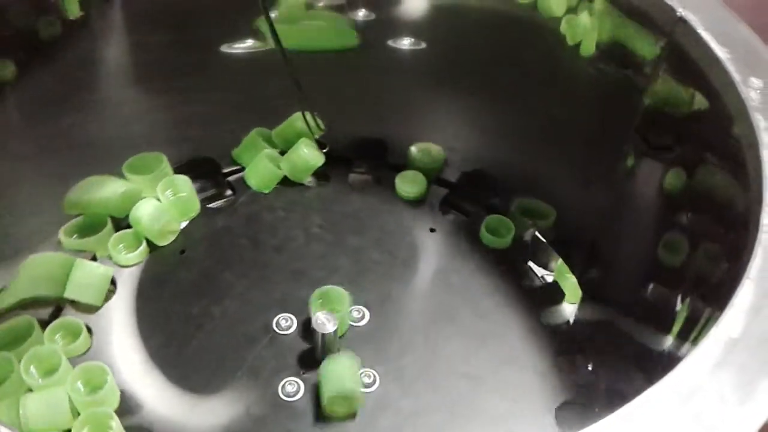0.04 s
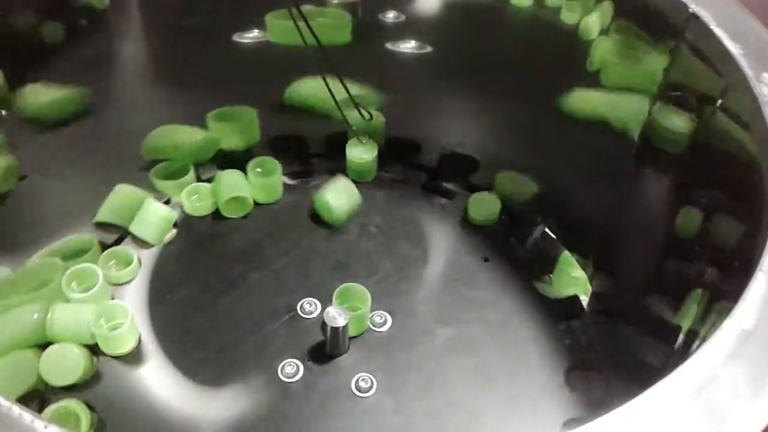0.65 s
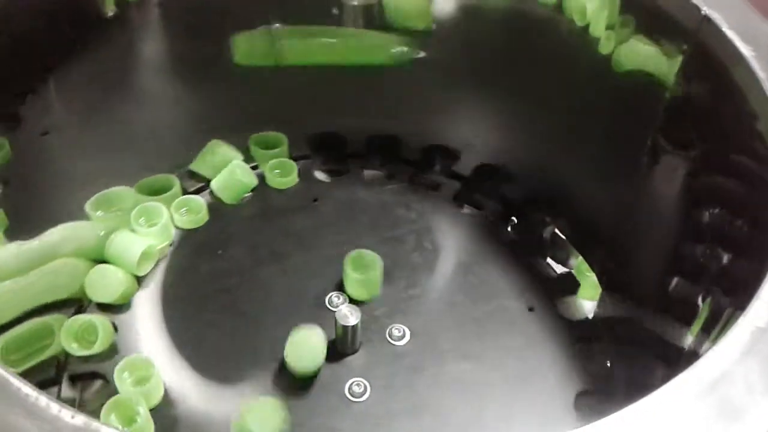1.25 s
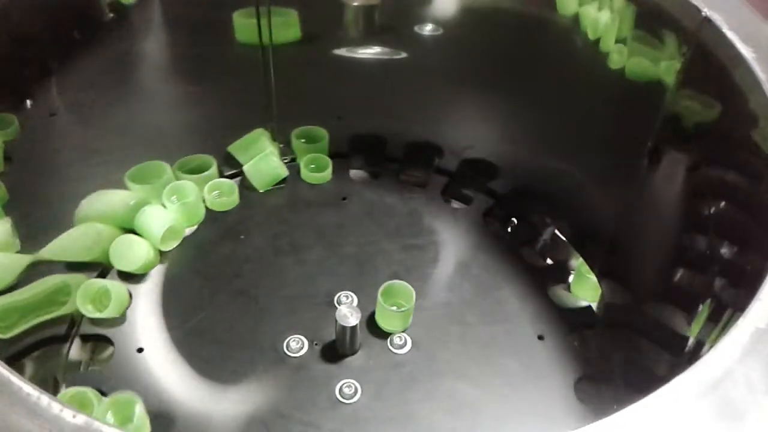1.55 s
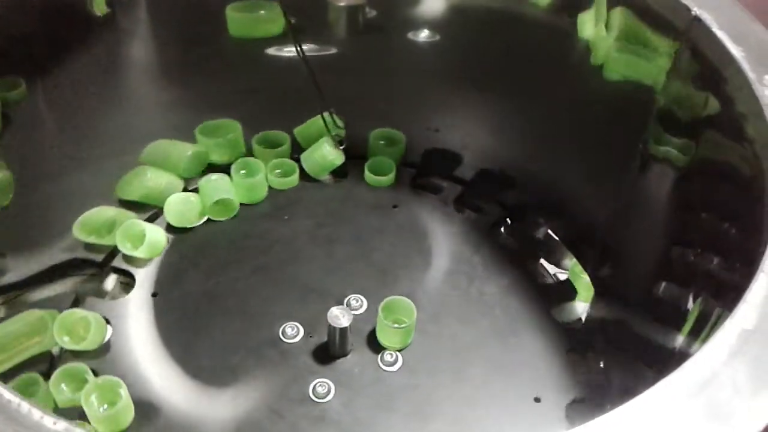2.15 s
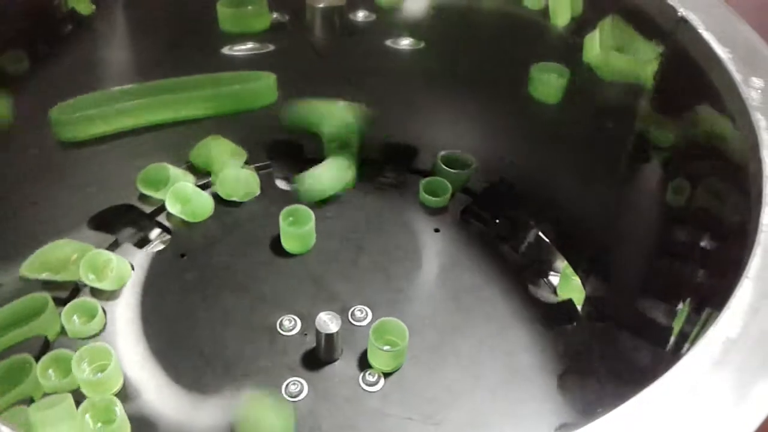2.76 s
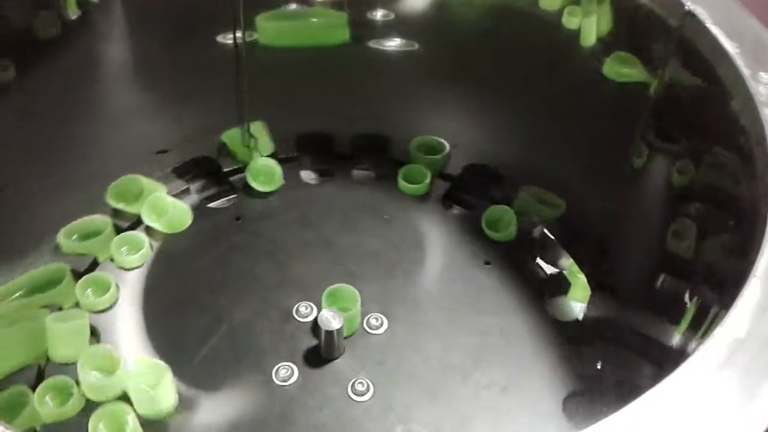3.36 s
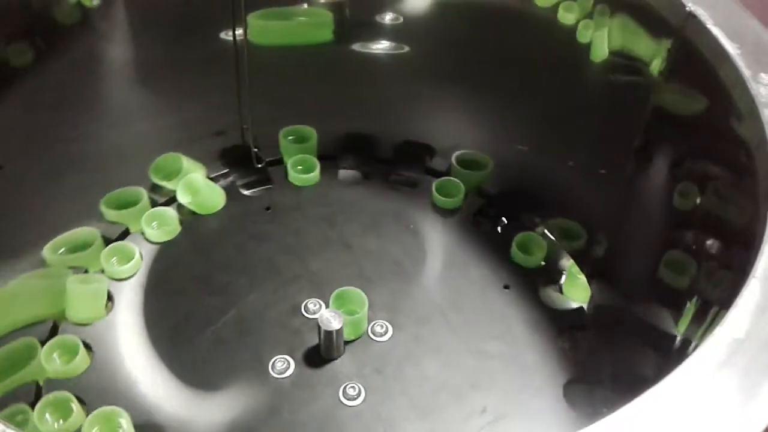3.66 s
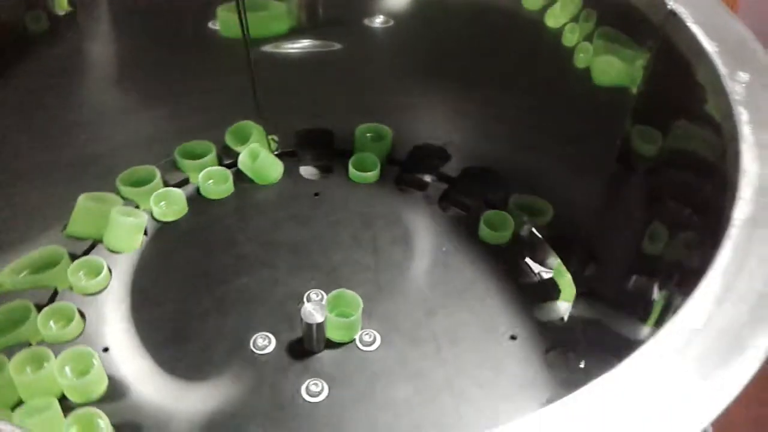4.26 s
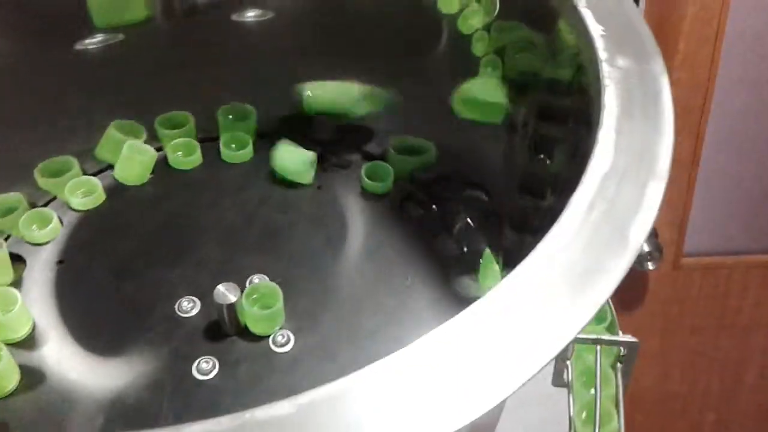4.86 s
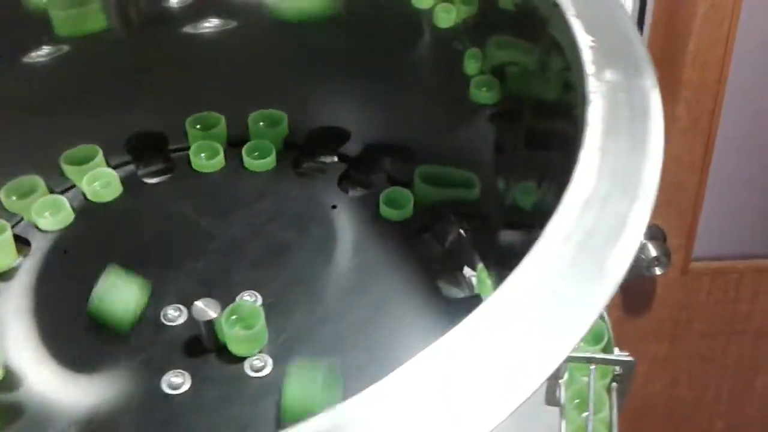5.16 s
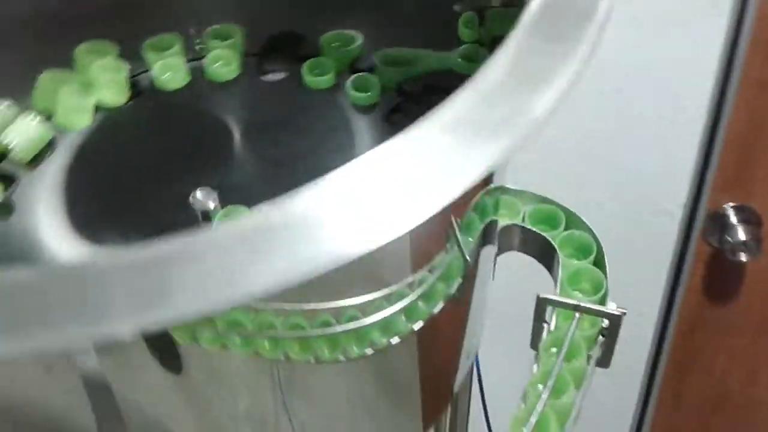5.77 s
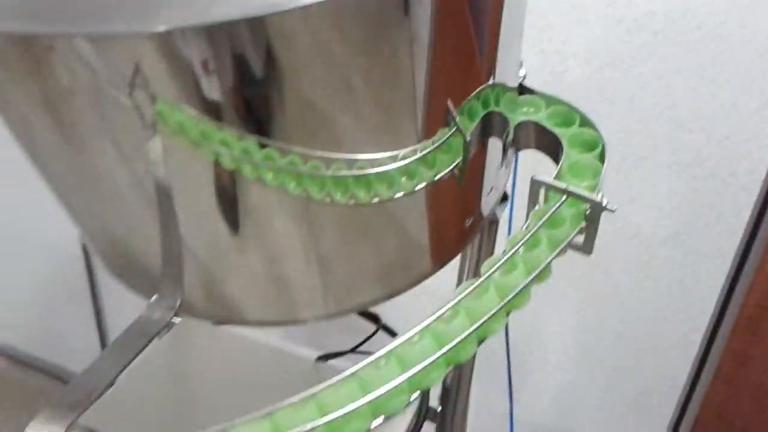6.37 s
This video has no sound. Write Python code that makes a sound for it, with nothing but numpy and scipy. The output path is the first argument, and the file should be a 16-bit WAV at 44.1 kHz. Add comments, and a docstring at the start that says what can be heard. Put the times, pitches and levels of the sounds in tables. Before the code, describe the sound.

Close over a rotating cap feeder, small plastic caps clatter against a steel bowl in three bursts, with bright clangs, dry clicks, hollow knocks and a soft boom from the disc. Between the bursts come scraping and a few stray hits, and a last brief stir follows. A high, regularly pulsing hiss and a quiet low motor hum run throughout. Everything is heard on the left side.

```python
"""Bottle caps in a rotary dispenser.

Plastic caps turn in a steel bowl, heard from close above the rim, on the left channel only.
A high hiss swells evenly, about 2.4 times a second, with scrapes and grinding over it.
Caps knock into the disc's pockets. Three times the heap tumbles and caps ring the bowl;
it stirs again at the end. A motor hums below."""
import sys
import numpy as np
from scipy import signal
from scipy.io import wavfile
from scipy.ndimage import uniform_filter1d

SR = 44100
rng = np.random.default_rng(int(sys.argv[2]) if len(sys.argv) > 2 else 0)


def int16_out(signal):
    """Quantize to a 16-bit WAV file."""
    q = np.round(np.clip(np.atleast_2d(signal).T, -1, 1) * 32767)
    wavfile.write(sys.argv[1], SR, q.astype(np.int16))


N = 291501
TIME = np.arange(N) / SR
SWELL_PERIOD_S = 0.4167


def amp(db):
    """Decibels to gain."""
    return 10 ** (np.asarray(db) / 20)


def read(points, hz):
    """A table's values at hz, interpolated on a log-frequency axis."""
    point_hz, value = np.transpose(points)
    return np.interp(np.log(hz + 1), np.log(point_hz), value)


def add(mix, s, sound):
    """Mixes a sound in at s seconds."""
    part = mix[max(round(s * SR), 0):][:len(sound)]
    part += sound[:len(part)]


def shaped(x, gain, size=512):
    """Filters x by gain(hz, s), frame by frame."""
    frames = dict(nperseg=size, noverlap=size * 3 // 4)
    hz, s, spectrum = signal.stft(x, SR, **frames)
    return signal.istft(spectrum * gain(hz[:, None], s), SR, **frames)[1][:len(x)]


def grains(per_s, spread_db, share, size=N):
    """Tiny uneven clicks over smooth noise; power 1, of which share is in the clicks."""
    clicks = (rng.random(size) < per_s / SR) * rng.choice([-1, 1], size)
    clicks = clicks * amp(spread_db * np.minimum(rng.exponential(1, size), 3))
    crackle = np.sqrt(share) * clicks / (clicks.std() + 1e-9)
    return crackle + np.sqrt(1 - share) * rng.standard_normal(size)


def band_noise(lo_hz, hi_hz, t):
    """Band-passed noise of power 1, as long as t."""
    band = signal.butter(2, [lo_hz, hi_hz], "band", fs=SR, output="sos")
    noise = signal.sosfilt(band, rng.standard_normal(len(t)))
    return noise / noise.std()


def coloured_noise(colour):
    """Steady noise filtered by rows of frequency in Hz, gain in dB."""
    return shaped(rng.standard_normal(N), lambda hz, s: amp(read(colour, hz)), size=2048)


def no_bass(x, cutoff_hz=190):
    """Takes out the deep bass below cutoff_hz."""
    return signal.sosfilt(signal.butter(3, cutoff_hz, "high", fs=SR, output="sos"), x)


def motor():
    """Mains hum over the soft rush of the drive; both swell and fade a little."""
    # Mains partials. Each row: frequency in Hz, rms level in dB before the swell.
    partials = [(50, -89), (100, -73)]
    # Drive noise. Each row: frequency in Hz, gain in dB.
    rush_colour = [(20, -68), (60, -54), (150, -54), (300, -54.5), (800, -43.5), (3000, -34.5),
                   (16000, -72)]
    # Slow swell. Each row: time in seconds, gain in dB.
    swell = [(1.7, -5.5), (4.0, 3), (4.6, 4), (6.6, 0)]
    hum = sum(amp(db) * np.sqrt(2) * np.sin(2 * np.pi * hz * TIME) for hz, db in partials)
    return (hum + coloured_noise(rush_colour)) * amp(np.interp(TIME, *np.transpose(swell)))


def scrape(s, start_s, length_s, attack_s=0.0065, release_s=0.025):
    """Envelope of a caught cap: it bites quickly, drags and slips free."""
    bite = np.clip((s - start_s) / attack_s, 0, 1)
    return bite * np.exp(-np.maximum(s - start_s - length_s, 0) / release_s)


def hiss_and_scrapes():
    """A high hiss swells evenly and flutters; caps scrape the wall and grind as the heap stirs."""
    # Levels at the swell tops. Each row: time in seconds, hiss in dB, higher fizz in dB.
    hiss_levels = [(0, -22, -26.5), (0.55, -19, -25.5), (1.0, -24, -36), (1.6, -27, -38.5),
                   (2.15, -25, -40.5), (2.648, -19.5, -35), (3.0, -23.5, -36), (3.75, -22.5, -33.5),
                   (4.3, -16, -31), (4.7, -17.5, -21), (5.1, -16.5, -25), (5.6, -21.5, -25.5),
                   (6.61, -24.5, -29)]
    # Caps caught on the wall. Each row: start in seconds, length in seconds, hiss in dB, grind in dB.
    scrapes = [(0.0, 0.0084, -17.5, -17), (0.588, 0.078, -14.5, -26.5), (0.658, 0.17, -32, -22),
               (1.835, 0.03, -34, -48), (2.088, 0.041, -26, -30), (2.26, 0.028, -22.5, -33),
               (2.488, 0.049, -22, -30.5), (2.687, 0.012, -14.5, -26), (3.09, 0.073, -16, -29),
               (3.188, 0.18, -23.5, -24), (3.925, 0.052, -16, -22.5), (3.984, 0.12, -20, -18),
               (4.104, 0.084, -16, -21), (5.181, 0.068, -16.5, -16), (5.263, 0.19, -29, -15.5),
               (6.424, 0.21, -18, -22.5)]
    # Three noise spectra. Each row: frequency in Hz, gain in dB.
    hiss_colour = [(500, -45), (2000, -25), (3500, -17.5), (4700, -6), (5500, -7.5), (7200, 0.5),
                   (9400, -3.5), (11000, -16.5), (16000, -24)]
    grind_colour = [(800, -27), (2200, -5), (2850, -2.5), (3400, -3.5), (4550, -0.5), (5500, -5),
                    (7000, -10), (10000, -46), (16000, -51)]
    fizz_colour = [(5000, -12.5), (8000, -4.5), (9700, 3.5), (11000, -0.5), (12200, -5.5), (13200, -10),
                   (15800, -14)]
    swell_top_s, steepness, hiss_dip_db, fizz_dip_db = 0.515, 3.1, -5.5, -17
    grind_rest_db, grind_stir_db = -41, -9
    times_s, hiss_db, fizz_db = np.transpose(hiss_levels)

    def gain(hz, s):
        swell_phase = 2 * np.pi * (s - swell_top_s) / SWELL_PERIOD_S
        lull = (1 - np.tanh(steepness * np.cos(swell_phase))) / 2
        hiss = amp(np.interp(s, times_s, hiss_db) + hiss_dip_db * lull)
        fizz = amp(np.interp(s, times_s, fizz_db) + fizz_dip_db * lull)
        grind = np.hypot(amp(grind_rest_db), amp(grind_stir_db) * stir(s))
        for start_s, length_s, scrape_hiss_db, scrape_grind_db in scrapes:
            caught = scrape(s, start_s, length_s)
            hiss = np.hypot(hiss, amp(scrape_hiss_db) * caught)
            grind = np.hypot(grind, amp(scrape_grind_db) * caught)
        layers = [(hiss, hiss_colour), (grind, grind_colour), (fizz, fizz_colour)]
        power = sum((level * amp(read(colour, hz))) ** 2 for level, colour in layers)
        return np.sqrt(power) * hz / np.hypot(hz, 350)  # bass roll-off

    wobble = uniform_filter1d(rng.standard_normal(N), size=400)
    flutter_db = 0.3 * wobble / wobble.std()
    return shaped(grains(per_s=3300, spread_db=0.5, share=0.32), gain) * amp(flutter_db)


def stir(s, build_db_per_s=42.5, settle_db_per_s=46.5, rest_db=-36):
    """Envelope of the heap's motion: each tumble builds, holds and settles to a restless minimum."""
    # The heap lifts and gives way. Each row: start of the hold in seconds, its length, level in dB.
    tumbles = [(0.45, 0.93, -22.5), (2.78, 0.57, -19), (4.8, 0.84, -22), (6.425, 0.19, -29.5)]
    power = amp(rest_db) ** 2
    for start_s, length_s, db in tumbles:
        before_s, after_s = np.maximum(start_s - s, 0), np.maximum(s - start_s - length_s, 0)
        power = power + amp(db - build_db_per_s * before_s - settle_db_per_s * after_s) ** 2
    return np.sqrt(power)


def heap():
    """Many small, dull collisions among the loose caps."""
    # Collision spectrum. Each row: frequency in Hz, gain in dB.
    colour = [(100, -71), (250, -5.5), (400, -25), (530, -3), (640, -17.5), (770, 1.5), (1000, -13.5),
              (1450, -5), (2400, -10), (4000, -16), (10000, -37)]
    collisions = grains(per_s=170, spread_db=2.5, share=0.29)
    return shaped(collisions, lambda hz, s: amp(read(colour, hz)) * stir(s), size=1024)


def pockets(pocket_hz=784.5, rise_s=0.0052, clunk_t60_s=0.082):
    """Caps knock hollowly and rattle in the disc's pockets, or land flat with a dull clunk."""
    # Pocket knocks and flat landings. Each row: start in seconds, level in dB.
    knocks = [(0.192, -35.5), (0.244, -37.5), (0.72, -30.5), (1.085, -23.5), (1.996, -37.5), (2.746, -24),
              (2.897, -24), (3.0, -24), (3.29, -24), (3.389, -29.5), (3.449, -32.5), (3.914, -30.5),
              (4.887, -22), (4.915, -26), (4.949, -24), (4.98, -30), (5.015, -27), (5.043, -29),
              (5.100, -24.5), (6.064, -38)]
    clunks = [(0.244, -36), (1.965, -39), (2.726, -33), (3.495, -34)]
    out, t = np.zeros(N), TIME[:SR // 4]
    envelope = t / rise_s * np.exp(1 - t / rise_s)
    for (s, db), detune in zip(knocks, rng.standard_normal(len(knocks))):
        hollow = np.sin(2 * np.pi * pocket_hz * (1 + 0.0076 * detune) * t)
        rattle = 0.28 * band_noise(pocket_hz / 2, 2 * pocket_hz, t)
        add(out, s, amp(db) * envelope * (hollow + rattle))
    for s, db in clunks:
        add(out, s, amp(db - 60 * t / clunk_t60_s) * band_noise(370, 670, t))
    return out


def strike(clang_db, note_hz, note_db, crash_db):
    """One blow: the wall clangs, the cap sounds a short note, a hard edge cracks and crashes."""
    # Spectra of wall and hard edge. Each row: frequency in Hz, gain in dB.
    clang_colour = [(100, -82), (300, -35), (420, -23), (750, -4.5), (1000, -10), (1500, -2), (2300, -3),
                    (4000, -8), (7000, -40), (16000, -112)]
    crash_colour = [(300, -60), (2000, -33), (4200, 5), (5500, -2), (7500, 6.5), (9500, -2.5),
                    (12000, -8.5), (16000, -25)]
    # Decay of a blow in the bowl. Each row: frequency in Hz, t60 in seconds.
    hang = [(250, 0.2), (700, 0.32), (1400, 1), (3000, 0.72), (8000, 0.36), (15000, 0.046)]
    chatter_t60_s, note_t60_s, crack_t60_s, pure_note_db = 0.17, 0.18, 0.035, -13
    t = TIME[:SR]

    def gain(hz, s):
        near_wall = 1 + 0.34 * np.exp(-s / 0.0043)  # answers first
        crash = amp(crash_db + read(crash_colour, hz)) * near_wall
        clang = amp(clang_db + read(clang_colour, hz))
        steel = np.hypot(clang, crash) * amp(-60 * s / read(hang, hz))
        chatter = 1 / (1 + ((hz - note_hz) / 260) ** 2)  # chatter on the steel blurs the note
        return np.hypot(steel, amp(note_db - 60 * s / chatter_t60_s) * chatter)

    envelope = amp(note_db + pure_note_db - 60 * t / note_t60_s) * (1 - np.exp(-t / 0.00055))
    note = envelope * np.sin(2 * np.pi * note_hz * t)
    bright_noise = np.gradient(np.tanh(rng.standard_normal(SR)))
    crack = amp(crash_db - 60 * t / crack_t60_s) * bright_noise
    return shaped(grains(per_s=1100, spread_db=4.5, share=0.18, size=SR), gain) + note + crack


def boom(db, rise_s=0.027):
    """The disc swings up within a few cycles of a blow and dies slowly."""
    # Drum-like disc modes. Each row: frequency in Hz, relative level in dB, t60 in seconds.
    modes = [(245.2, -2.5, 0.74), (256.2, 1, 0.55)]
    t = TIME[:2 * SR]
    swing = sum(amp(mode_db - 60 * t / t60_s) * np.sin(2 * np.pi * hz * t)
                for hz, mode_db, t60_s in modes)
    return amp(db) * swing * (1 - np.exp(-t / rise_s))


def falling_caps():
    """Caps strike the steel; the disc booms under each blow."""
    # Blows. Each row: start in seconds, clang in dB, cap note in Hz, then note, crash and boom in dB.
    hits = [(0.242, -21.5, 2675, -19, -38, -62), (0.36, -18.5, 2155, -17, -41, -60),
            (0.68, -14.5, 2380, -10, -44, -40), (0.702, -39, 3433, -11.5, -20.5, -47),
            (0.749, -29, 1630, -18.5, -18.5, -42), (0.789, -16.5, 3400, -12.5, -19.5, -66),
            (0.926, -14, 2200, -7, -27, -64), (0.997, -14.5, 1546, -14.5, -29.5, -54),
            (1.083, -22.5, 3515, -31, -38, -39), (1.115, -15.5, 1525, -12, -28.5, -34),
            (1.164, -13.5, 2150, -32, -26, -32), (1.235, -19, 1657, -12, -34, -50),
            (1.425, -26, 1610, -10.5, -53, -39), (1.497, -23.5, 1500, -24, -56, -53),
            (1.964, -34, 3530, -39, -51, -56), (2.723, -27, 1940, -10, -50, -58),
            (2.743, -15, 3300, -13, -33, -30), (2.789, -15, 1598, -9.5, -17.5, -44),
            (2.911, -16.5, 2140, -19, -30, -31), (3.101, -14, 1645, -26, -47, -31),
            (3.233, -18, 1895, -8.5, -45, -60), (3.297, -20, 1543, -19, -26, -67),
            (3.495, -16.5, 2140, -17, -27.5, -43.5), (3.877, -22.5, 1917, -21, -44, -52),
            (4.887, -26, 2766, -16, -43, -30.5), (4.903, -18, 2104, -12, -38, -48),
            (5.016, -38, 1366, -22.5, -32, -55), (5.131, -20.5, 1686, -21, -20.5, -42),
            (5.193, -24, 3530, -32, -23, -42.5), (5.277, -15.5, 2280, -12, -25.5, -60),
            (5.29, -24, 1426, -10.5, -43, -60), (5.366, -13, 2190, -34, -25.5, -43.5),
            (5.756, -26.5, 1430, -29, -37, -48), (6.059, -27.5, 1790, -38, -50, -61),
            (6.147, -41, 1398, -23, -54, -56), (6.346, -19.5, 1430, -20, -50, -39),
            (6.434, -44, 3140, -40, -36, -34)]
    out = np.zeros(N)
    for s, clang_db, note_hz, note_db, crash_db, boom_db in hits:
        add(out, s, strike(clang_db, note_hz, note_db, crash_db))
        add(out, s, boom(boom_db))
    return out


def bowl(x, ring_db=-3, wash_db=-6, wash_t60_s=0.05):
    """The steel rings at its modes; the hollow returns a short wash that shifts as the caps go round."""
    # Bowl modes. Each row: frequency in Hz, relative gain in dB, t60 in seconds.
    modes = [(525, 12.5, 0.84), (723, 16, 1.3), (743.7, 13.5, 0.54), (874, 13.5, 0.85), (929, 11, 1.2),
             (1058, 18, 1.2), (1207, 22.5, 1.28), (1329, 14, 0.98), (1363, 12.5, 0.9), (1385, 15.5, 0.81),
             (1537, 14, 0.48), (1600, 11.5, 0.7), (1847, 6, 1.2), (1888, 6.5, 0.57), (2050, 14, 0.31),
             (2250, 11.5, 0.58), (6742, 2, 0.23)]
    crowded_modes = [(hz, 1, 0.6) for hz in rng.uniform(2400, 4400, size=26)]
    t = TIME[:2 * SR]
    ring = np.zeros(len(t))
    for hz, db, t60_s in modes + crowded_modes:
        unity_peak = 2 * np.log(1000) / (t60_s * SR)  # scales a mode to gain 1 at resonance
        ring += unity_peak * amp(db - 60 * t / t60_s) * np.cos(2 * np.pi * hz * t)
    out = signal.fftconvolve(x, amp(ring_db) * ring)[:N]
    t = TIME[:SR // 4]
    for side_rad in np.arange(4) * np.pi / 4:
        wash = shaped(rng.standard_normal(len(t)), lambda hz, s: hz / np.hypot(hz, 1500))
        wash *= amp(-60 * t / wash_t60_s)
        nearness = np.cos(np.pi * TIME / SWELL_PERIOD_S + side_rad)
        out += signal.oaconvolve(x * nearness, amp(wash_db) * wash / np.linalg.norm(wash))[:N]
    return out


def snaps():
    """Plastic rims snap past each other: dry clacks, from a bare tick to a short rattle."""
    # Rim snaps. Each row: start in seconds, level in dB, decay time constant in seconds.
    ticks = [(1.081, -17, 0.0049), (1.095, -23, 0.0007), (1.964, -34, 0.002), (2.742, -17.5, 0.012),
             (3.493, -26.5, 0.0071), (4.896, -19, 0.0051), (5.017, -15.5, 0.0015)]
    out, t = np.zeros(N), TIME[:SR // 8]
    for s, db, decay_s in ticks:
        rim = band_noise(1960, 5400, t) + 0.15 * rng.standard_normal(len(t))
        add(out, s, amp(db) * rim * np.exp(-t / decay_s))
    return out


def scene():
    """Caps, hiss, bowl and motor on the left channel; blows ring the wall most."""
    blows = no_bass(falling_caps() + snaps())
    hiss_and_heap = no_bass(hiss_and_scrapes() + heap())
    knocks = no_bass(pockets())
    ringing = bowl(amp(3) * blows + amp(-1.5) * (hiss_and_heap + knocks))
    return np.array([blows + hiss_and_heap + knocks + ringing + motor(), np.zeros(N)])


def record(dry):
    """Microphone gain, faint preamp noise on both channels, then a low-pass."""
    # Preamp noise. Each row: frequency in Hz, gain in dB.
    preamp_colour = [(30, -50), (1400, -86), (10000, -93)]
    gain_db, cutoff_hz = 6, 15950
    preamp = np.array([coloured_noise(preamp_colour) for _ in dry])
    low_pass = signal.firwin(511, cutoff_hz, window=("kaiser", 9), fs=SR)
    return signal.oaconvolve(amp(gain_db) * dry + preamp, low_pass[None], "same")


dry = scene()
out = record(dry)
int16_out(out)
```